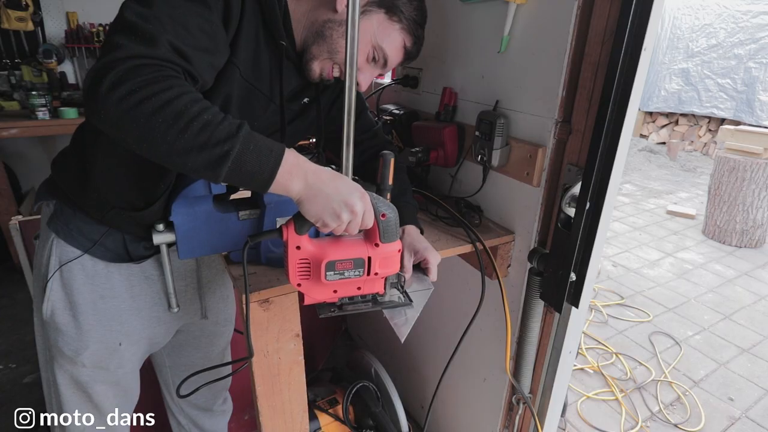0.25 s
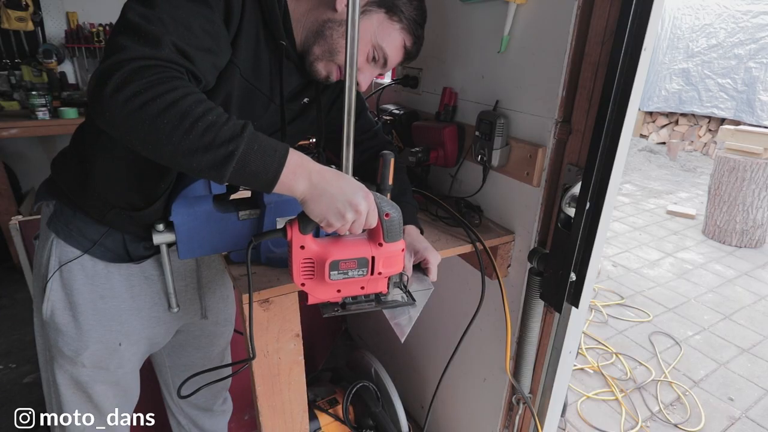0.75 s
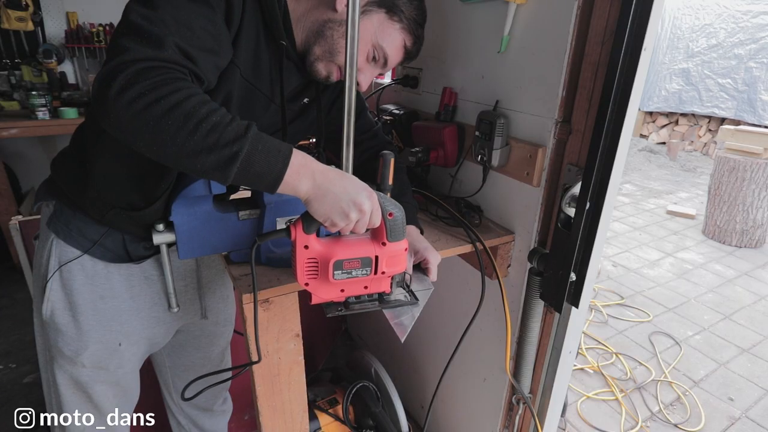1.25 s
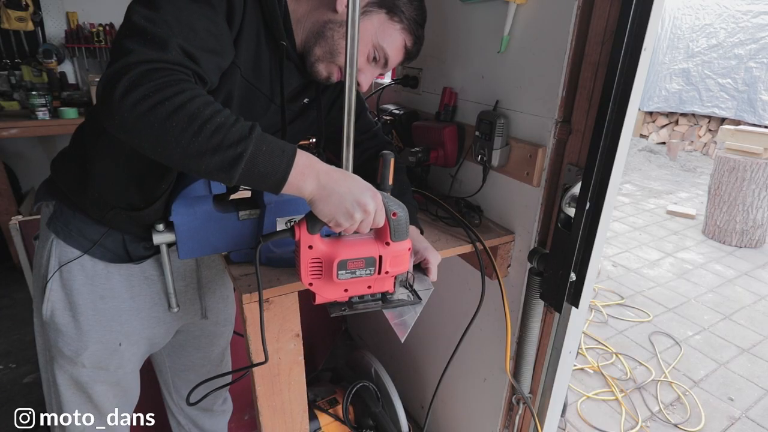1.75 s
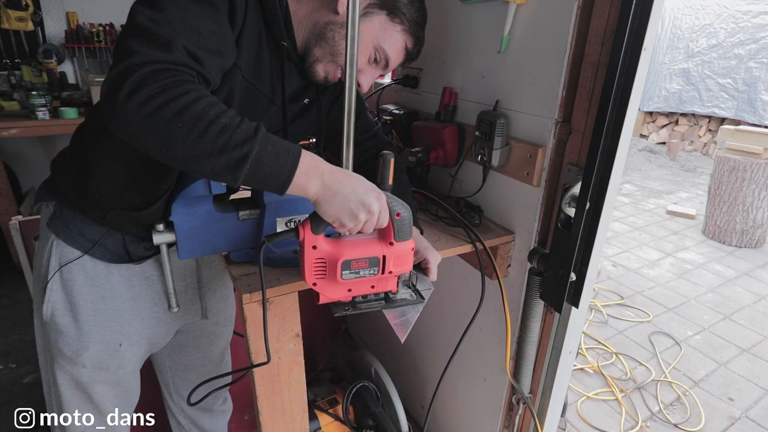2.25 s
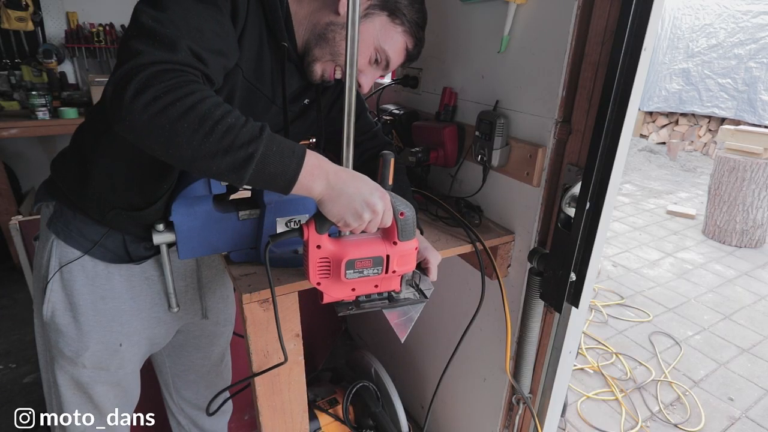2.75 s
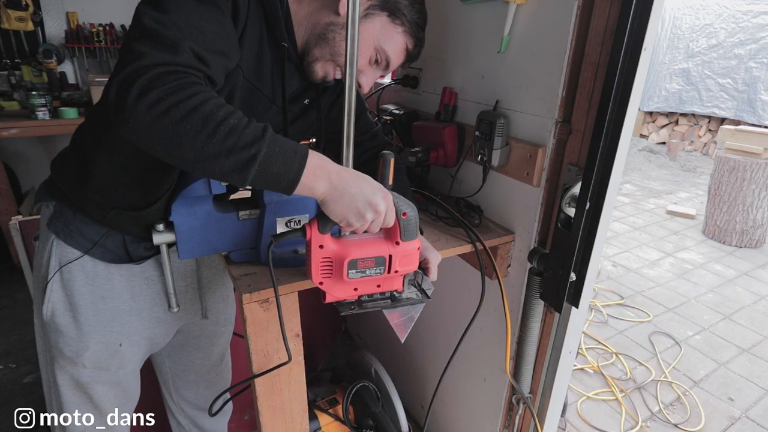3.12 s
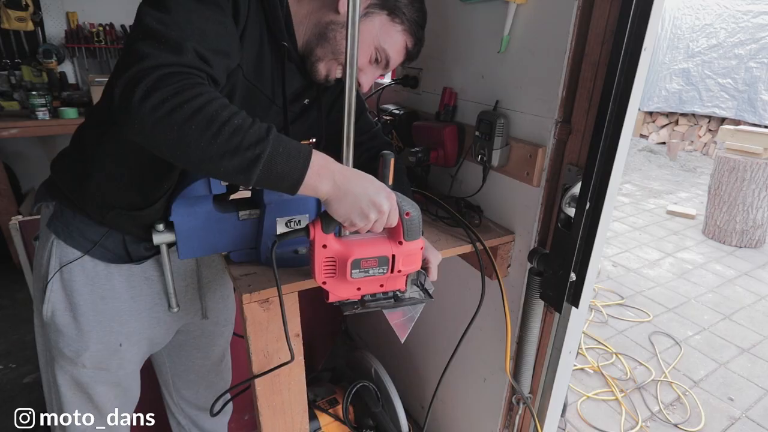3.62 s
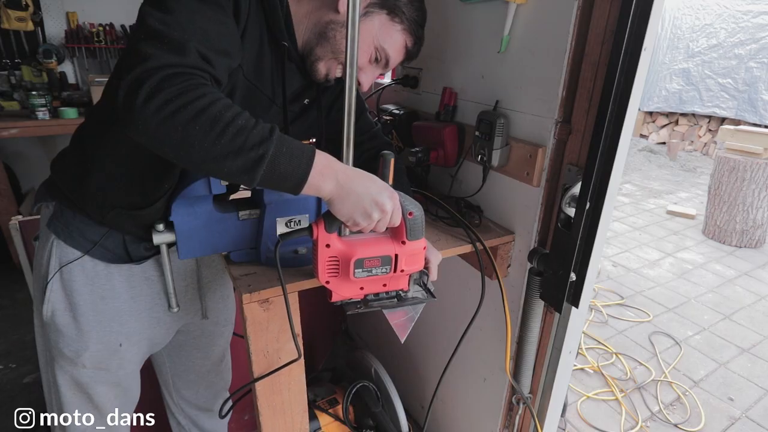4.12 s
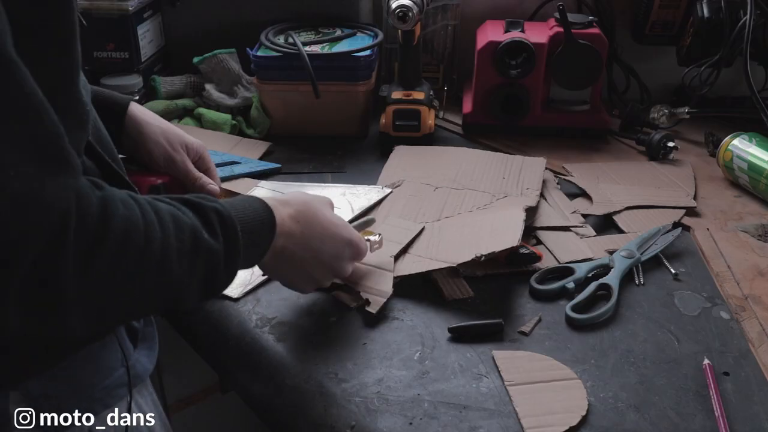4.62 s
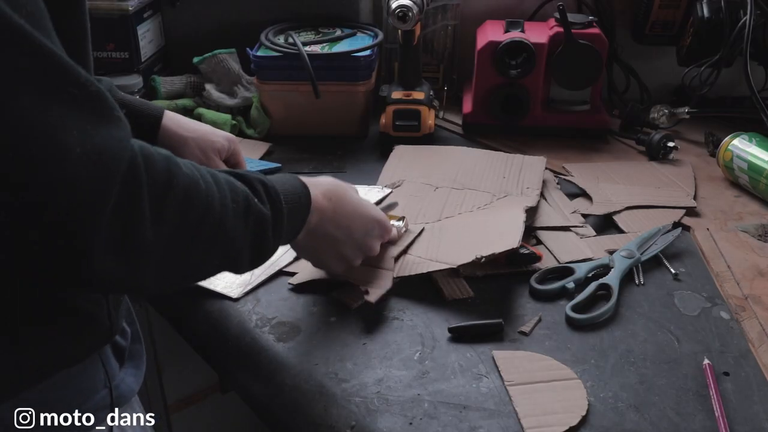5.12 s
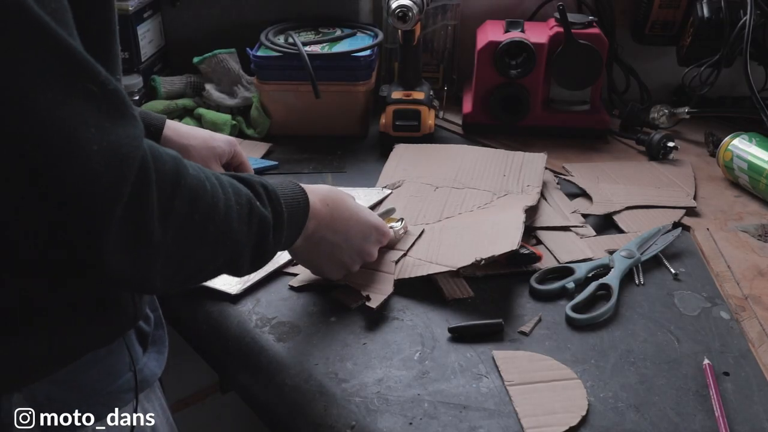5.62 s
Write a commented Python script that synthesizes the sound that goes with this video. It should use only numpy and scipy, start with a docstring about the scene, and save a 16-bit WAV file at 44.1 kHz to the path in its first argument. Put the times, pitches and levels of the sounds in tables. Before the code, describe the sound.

High-pitched, rapid jigsaw cutting of sheet metal, followed suddenly by hands shuffling cardboard and clicking small parts on a bench.

```python
"""Jigsaw, then a quiet bench.

A jigsaw cuts thin aluminium sheet held in a vice. Its teeth rasp on every stroke and set the sheet
ringing and drumming over the motor's hum and gear whine. At 4.2 s the scene switches to a quiet bench,
where hands rustle, shuffle card, and click and knock small parts over the rumble of the room."""
import sys
import numpy as np
from scipy import signal
from scipy.fft import rfft, irfft, next_fast_len
from scipy.io import wavfile
from scipy.ndimage import uniform_filter1d

SR = 44100
rng = np.random.default_rng(int(sys.argv[2]) if len(sys.argv) > 2 else 0)


def int16_out(signal):
    """Quantize to a 16-bit WAV file."""
    q = np.round(np.clip(np.atleast_2d(signal).T, -1, 1) * 32767)
    wavfile.write(sys.argv[1], SR, q.astype(np.int16))


N = 259263


def amp(db):
    return 10 ** (np.asarray(db) / 20)


def unit_rms(x):
    return x / np.sqrt(np.mean(x ** 2) + 1e-20)


def unit_peak(x):
    return x / abs(x).max()


def curves(rows):
    """Each column after the time column, interpolated to every sample."""
    times, *columns = np.transpose(rows)
    return [np.interp(np.arange(N) / SR, times, column) for column in columns]


def butter(x, order, hz, kind):
    return signal.sosfilt(signal.butter(order, hz, kind, fs=SR, output="sos"), x)


def coloured(x, spectrum, modes=()):
    """Filter by a spectrum raised at each mode, to unit RMS. Minimum phase: rings follow their cause."""
    size = next_fast_len(len(x) + 8192, True)
    hz = np.fft.rfftfreq(size, 1 / SR)
    points_hz, points_db = np.transpose(spectrum)
    gain = amp(np.maximum(np.interp(np.log(hz + 1), np.log(points_hz + 1), points_db), -100))
    for centre_hz, width_hz, db in modes:
        gain *= 1 + amp(db) / (1 + (2 * (hz - centre_hz) / width_hz) ** 2)
    cepstrum = irfft(np.log(gain), size)
    cepstrum[1:size // 2] *= 2
    cepstrum[size // 2 + 1:] = 0
    return unit_rms(irfft(rfft(x, size) * np.exp(rfft(cepstrum)), size)[:len(x)])


def add(mix, start_s, sound):
    part = mix[round(start_s * SR):][:len(sound)]
    part += sound[:len(part)]


def grit(depth_db, grain_s):
    """Noise whose level flickers in grains."""
    flicker = unit_rms(uniform_filter1d(rng.standard_normal(N), int(grain_s * SR)))
    return rng.standard_normal(N) * amp(depth_db * np.clip(flicker, -3, 3))


def echoes(x, t60_s, db):
    """Add a short tail of sparse reflections."""
    t = np.arange(SR // 4) / SR
    tail = rng.standard_normal(len(t)) * (rng.random(len(t)) < .1) * amp(-60 * t / t60_s) * (t > .003)
    return x + amp(db) * signal.oaconvolve(x, tail / np.linalg.norm(tail))[:N]


def swells(peaks_s, peaks_db, rise_db_s, fall_db_s):
    """Envelope of overlapping movements, summed in power."""
    since_s = np.arange(N) / SR - peaks_s[:, None]
    db = peaks_db[:, None] + np.where(since_s < 0, rise_db_s, -fall_db_s) * since_s
    return np.sqrt((amp(db) ** 2).sum(0))


# Room spectrum. Each row: frequency in Hz, relative level in dB.
ROOM_SPECTRUM = [(12, -49), (20, 4), (38, -2.5), (216, -13), (367, -20.5), (446, -17.5), (678, -23.5),
                 (759, -13), (825, -16.5), (1150, -25), (1370, -31), (3840, -46), (7310, -39.5),
                 (16000, -62)]


def room():
    """Steady rumble with a little hiss."""
    return amp(-47) * coloured(rng.standard_normal(N), ROOM_SPECTRUM)


# Handling spectra. Each row: frequency in Hz, relative level in dB.
RUSTLE_SPECTRUM = [(880, -28), (1500, -27), (1640, -17), (2000, -53), (2610, -8), (3880, -8), (4870, -5),
                   (7840, -1), (16000, -35)]
SHUFFLE_SPECTRUM = [(150, -18), (250, 0.5), (512, -5), (664, 0), (1020, 2), (1420, -2), (3000, -17.5),
                    (3900, -23), (6600, -120)]
# Hand movements. Each row: peak time in seconds, rustle in dB, shuffle in dB.
HAND_MOVES = [(4.21, -58.5, -55.5), (4.44, -50, -64), (4.53, -51, -75), (4.6, -49.5, -58),
              (4.85, -51.5, -57.5), (4.97, -56.5, -74), (5.2, -55.5, -55), (5.31, -47, -52),
              (5.42, -54.5, -67), (5.52, -61.5, -74), (5.62, -67, -78)]


def hands():
    """Each movement swells a bright rustle and a duller shuffle of card."""
    peaks_s, rustle_db, shuffle_db = np.transpose(HAND_MOVES)
    rustle_gain = swells(peaks_s, rustle_db, rise_db_s=196, fall_db_s=103)
    shuffle_gain = amp(-64.5) + swells(peaks_s, shuffle_db, rise_db_s=76, fall_db_s=45)
    rustle = coloured(grit(depth_db=1.8, grain_s=.01), RUSTLE_SPECTRUM)
    shuffle = coloured(grit(depth_db=1.6, grain_s=.0046), SHUFFLE_SPECTRUM)
    return rustle_gain * rustle + shuffle_gain * shuffle


# Bench modes. Each row: frequency in Hz, relative level in dB, T60 in seconds.
BENCH_MODES = [(295, -17, 0.064), (448, -7, 0.046), (555, -9, 0.2), (790, -4.5, 0.064), (1008, -3, 0.092),
               (1147, 7, 0.044), (1413, 7.5, 0.083), (1760, -28, 0.045), (2130, -7, 0.046)]
# Blows on the bench. Each row: start in seconds, dry peak in dB, hardness as a corner in Hz.
BENCH_BLOWS = [(4.4031, -33, 2500), (4.62, -28, 1510), (4.638, -31, 910), (4.653, -34, 1180),
               (4.812, -37.5, 710), (4.935, -48, 2500), (5.158, -23, 2060), (5.176, -26, 1090),
               (5.187, -33, 1800), (5.261, -32, 1320), (5.281, -31, 1110), (5.288, -30.5, 900),
               (5.403, -37.5, 696), (5.496, -36, 1520)]


def knocks():
    """Each blow thuds and rings the bench modes in its own mix; a soft blow loses the high ones."""
    out, t = np.zeros(N), np.arange(6000) / SR
    for start_s, db, hard_hz in BENCH_BLOWS:
        noise = rng.standard_normal(len(t))
        ring = 0
        for (hz, mode_db, t60_s), gain_draw, tune_draw in zip(BENCH_MODES, noise, noise[::-1]):
            envelope = amp(mode_db + 5.1 * gain_draw - 60 * t / t60_s) / (1 + (hz / hard_hz) ** 2)
            ring += envelope * np.sin(2 * np.pi * hz * (1 + .041 * tune_draw) * t)
        thud = butter(noise * np.exp(-t / .0068), 2, [450, 1.19 * hard_hz], "band")
        add(out, start_s, amp(db) * unit_peak(unit_peak(ring) + .66 * unit_peak(thud)))
    return echoes(out, t60_s=.11, db=-7.5)


# Clicks of small parts. Each row: start in seconds, level in dB, centre in Hz, decay in seconds,
# bandwidth in octaves.
PART_CLICKS = [(4.293, -29.5, 7400, 0.0019, 0.48), (4.333, -37.5, 6600, 0.0072, 1.35),
               (4.3999, -25, 7000, 0.0027, 1.2), (4.402, -17, 8700, 0.007, 0.35),
               (4.4042, -16.5, 6300, 0.0008, 0.98), (4.4128, -22.5, 5730, 0.0024, 0.36),
               (4.418, -22.5, 4850, 0.00052, 2.6), (4.4285, -21.5, 6000, 0.0027, 0.85),
               (4.612, -32, 5350, 0.0017, 0.64), (4.626, -30, 3800, 0.0028, 1.7),
               (4.777, -43, 7300, .004, 1.3), (4.869, -23.5, 6640, 0.00041, 0.77),
               (4.874, -35, 5770, 0.0022, 0.37), (4.93, -28, 5840, 0.0053, 1.7),
               (4.935, -22, 6460, 0.0023, 1.9), (4.938, -27, 6840, 0.0067, 0.46),
               (4.961, -35, 7500, 0.004, 0.89), (5.139, -31, 7200, 0.006, 1.2),
               (5.16, -26, 3280, 0.0013, 2.1), (5.186, -29.5, 3000, 0.0023, 3.2),
               (5.192, -36.5, 6840, 0.0028, 0.4), (5.253, -46, 4750, 0.0039, 1.2),
               (5.2794, -20, 4700, 0.0014, 1.9), (5.287, -20, 6600, 0.0022, 0.97),
               (5.345, -42.5, 2450, 0.0025, 0.42), (5.408, -32.5, 5450, 0.0042, 2.1),
               (5.495, -28.5, 3300, 0.00067, 1.83)]
# Colour of all clicks. Each row: frequency in Hz, relative gain in dB.
CLICK_COLOUR = [(200, 25), (3000, 5), (7000, 5.5), (9500, 0), (12000, -5), (16000, -9)]


def clicks():
    """Small hard parts touch: a sharp tick and a dying crackle in one band."""
    out, t = np.zeros(N), np.arange(2500) / SR
    attack = np.minimum(t / .00056, 1)
    for start_s, db, hz, decay_s, octaves in PART_CLICKS:
        decay = np.exp(-t / decay_s) + .12 * np.exp(-t / (6.9 * decay_s))
        spread = 2 ** (octaves / 2)
        burst = butter(rng.standard_normal(len(t)) * attack * decay, 2, [hz / spread, hz * spread], "band")
        add(out, start_s, amp(db) * unit_peak(burst))
    return echoes(coloured(out, CLICK_COLOUR) * np.std(out), t60_s=.084, db=-8)


# Crank harmonics. Each row: multiple of the stroke rate, RMS level in dB.
CRANK_HARMONICS = [(1, -86.5), (2, -83), (3, -81.5), (4, -88), (5, -81), (6, -83.5), (8, -80.5)]


def motor(turns):
    """The crank hums at multiples of the stroke rate."""
    return sum(amp(db) * np.sqrt(2) * np.cos(2 * np.pi * (k * turns + rng.random()))
               for k, db in CRANK_HARMONICS)


# Drumming spectrum. Each row: frequency in Hz, relative level in dB.
DRUM_SPECTRUM = [(15, -89), (25, -38), (118, -28.5), (320, -21), (555, -12), (831, -1), (1140, -6.5),
                 (1820, -4.5), (2160, -12.5), (4000, -19.5), (5200, -16), (8800, -120)]
# Low sheet modes. Each row: frequency in Hz, width in Hz, strength in dB.
LOW_MODES = [(472, 5.7, 3.5), (813, 30, -9), (1048, 5.3, 5.5), (1366, 15, 1.5)]


def sheet_drum(turns):
    """The sheet drums in its low modes, pulsing twice a stroke."""
    pulse = 1 + .14 * np.cos(4 * np.pi * (turns - .15))
    return coloured(grit(depth_db=1.2, grain_s=.002) * pulse, DRUM_SPECTRUM, LOW_MODES)


# Sizzle level. Each row: time in seconds, level in dB.
SIZZLE_LEVELS = [(2.9, -85), (3.2, -66), (3.7, -61), (4.1, -62), (4.2, -68)]


def sheet_sizzle(contact, mode_hz=10850):
    """A high sheet mode sizzles near the end of the cut."""
    level_db, = curves(SIZZLE_LEVELS)
    drive = rng.standard_normal(N) * (contact + .25)
    return amp(level_db) * unit_rms(butter(drive, 1, [mode_hz - 70, mode_hz + 70], "band"))


# Motor gear whine at 826 Hz, then three sheet modes rung by the teeth.
# Each row: frequency in Hz, T60 in seconds, lead on mid-cut in strokes.
STROKE_TONES = [(826, 0.041, 0.23), (1640, 0.021, 0.076), (1884, 0.005, .01), (3400, 0.018, .01)]
# Tone levels. Each row: time in seconds, then the level in dB of each of the four tones.
TONE_LEVELS = [(0, -64, -58, -68, -79), (.3, -68, -58, -78, -65), (.55, -70, -57.5, -62, -69),
               (.9, -64, -57.5, -69, -63), (1.05, -69, -54.5, -73, -68), (1.7, -57, -57, -63, -77),
               (1.95, -62, -54.5, -60.5, -75), (2.3, -71, -71, -55, -70), (3, -71, -59.5, -52.5, -68),
               (3.6, -72, -59, -49, -68), (4.2, -62, -61, -48.5, -75)]
MAX_STROKES = 250


def whine_and_rings(turns, stroke, phase, force):
    """Gear whine and three sheet modes, all pulsing in step with the crank."""
    stroke_hz = np.maximum(np.gradient(turns) * SR, 1)
    offset_cycles = .14 * rng.standard_normal(MAX_STROKES)[stroke]
    back = .45 * np.exp(-((phase - .47) / .16) ** 2)
    out, t = 0, np.arange(3000) / SR
    for (hz, t60_s, lead), db in zip(STROKE_TONES, curves(TONE_LEVELS)):
        forward = force * np.exp(-abs((phase + lead) / .14) ** 4)
        push = (forward + back) * np.cos(2 * np.pi * (hz * phase / stroke_hz + offset_cycles))
        response = amp(-60 * t / t60_s) * np.cos(2 * np.pi * hz * t)
        out += amp(db) * unit_rms(signal.oaconvolve(push, response)[:N])
    return out


def sheet_flex(x, depth_db=1.3):
    """Patches of the spectrum swell and fade as the flexing sheet favours other modes."""
    spectra = signal.stft(x, nperseg=256)[2]
    drift = uniform_filter1d(rng.standard_normal(spectra.shape), size=2, axis=0)
    drift = unit_rms(uniform_filter1d(drift, size=70, axis=1))
    return unit_rms(signal.istft(spectra * amp(depth_db * drift), nperseg=256)[1][:N])


# Blade catches. Each row: time in seconds, level over a usual stroke in dB.
BLADE_CATCHES = [(.658, 2), (.877, 2), (.897, 5.5), (1.005, 3), (1.246, 4.5), (2.205, 7), (3.03, 4.5),
                 (3.138, 2), (3.741, 2.5), (4.064, 5.5)]


def blade_bite(turns, stroke, phase, shift):
    """Envelope of the cutting strokes: the blade digs in slowly, lets go fast and sometimes catches."""
    catch_s, catch_db = np.transpose(BLADE_CATCHES)
    caught = np.round(turns[(catch_s * SR).astype(int)]).astype(int)
    bite_db = 1.3 * rng.standard_normal(MAX_STROKES)
    bite_db[caught] = catch_db
    width = np.where(phase < .03, .16, .11)
    return amp(bite_db[stroke]) * np.exp(-abs((phase - .01 - shift) / width) ** 1.26)


def blade_drag(phase, shift):
    """Envelope of the teeth dragging back, about half a stroke after the cut."""
    offset = (phase - .46 - shift + .5) % 1 - .5
    return np.exp(-(offset / .064) ** 2)


# Rasp spectrum. Each row: frequency in Hz, relative level in dB.
RASP_SPECTRUM = [(1180, -33), (2000, -21.5), (2260, -14), (3370, -13), (3740, -12.5), (5250, -10),
                 (7060, -9), (11100, -19.5), (16000, -39.5)]
# Sheet modes, whole and nearly cut through. Each row: frequency in Hz, width in Hz, strength in dB.
WHOLE_MODES = [(2577, 81, 0.5), (3040, 98, 2.5), (3380, 76, 1), (4740, 98, -10), (6170, 200, -4),
               (7110, 650, -0.5), (8480, 100, 2.5), (9530, 1200, -2.5), (11900, 83, -36)]
FREED_MODES = [(3130, 60, 0), (3405, 57, 4.5), (4860, 43, 1), (5860, 640, 2), (6890, 270, 7),
               (7700, 135, 9.5), (8790, 980, 7), (12900, 280, 0)]


def rasp(contact, rattle_db, freed, treble_db):
    """Teeth tear the sheet over a duller rattle; the modes shift as the kerf grows."""
    tearing = grit(depth_db=1.83, grain_s=.00038) * contact
    rattle = amp(rattle_db) * butter(grit(depth_db=3.1, grain_s=.0011), 1, 10000, "low")
    whole = coloured(tearing + rattle, RASP_SPECTRUM, WHOLE_MODES)
    loose = coloured(tearing + rattle, RASP_SPECTRUM, FREED_MODES)
    sheet = sheet_flex((1 - freed) * whole + freed * loose)
    return sheet + (amp(treble_db) - 1) * butter(sheet, 1, 9000, "high")


# Blade travel. Each row: time in seconds, strokes so far (whole numbers fall at mid-cut).
STROKE_COUNT = [(0, -.31), (.4, 18.15), (1, 45.62), (2.6, 119.12), (3.2, 146.8), (4, 183.96),
                (4.21, 193.69)]
# Feed: clean, then chattering, then settled. Each row: time in seconds, rasp in dB,
# rattle relative to the tearing in dB, drumming in dB.
FEED_LEVELS = [(0, -49.5, -9, -50), (.3, -45, -13, -51), (.7, -43, -13.5, -51.5), (1.4, -44, -11.5, -51),
               (1.64, -44, -7, -46), (1.95, -46, -5, -48.5), (2.15, -44.5, -6, -47.5),
               (2.25, -46.5, -7.5, -50.5), (2.4, -43.5, -9, -48.5), (2.8, -42.5, -9.5, -49),
               (3.4, -43.5, -11, -51.5), (3.8, -44, -10.5, -51), (4.2, -47.5, -4, -51.5)]
# Growing kerf. Each row: time in seconds, sheet freed from 0 to 1, return drag relative to the cut
# in dB, treble lift in dB.
KERF_GROWTH = [(0, 0.07, -8, 11.5), (.6, 0.28, -25, 9), (1.2, 0.2, -13, 4), (1.9, 0, -25, 5),
               (2.3, 0.1, -10, 2), (3, 0.93, -5.5, 2.5), (3.6, 0.66, -9.5, 5.5), (4.2, 0.76, -34, 4.5)]


def jigsaw():
    """The crank drives the blade through the sheet and more softly back; no two strokes are alike."""
    turns, = curves(STROKE_COUNT)
    rasp_db, rattle_db, drum_db = curves(FEED_LEVELS)
    freed, drag_db, treble_db = curves(KERF_GROWTH)
    stroke = np.floor(turns + .25).astype(int)
    phase = turns - stroke  # -.25 to .75 strokes from mid-cut
    drag_draw, shift_draw, late_draw, tone_draw = rng.standard_normal((MAX_STROKES, 4))[stroke].T
    bite = blade_bite(turns, stroke, phase, shift=.019 * shift_draw)
    drag = amp(drag_db + 4.5 * drag_draw) * blade_drag(phase, shift=.042 * late_draw)
    contact = bite + drag
    return (amp(rasp_db) * rasp(contact, rattle_db, freed, treble_db)
            + sheet_sizzle(contact)
            + whine_and_rings(turns, stroke, phase, force=amp(1.2 * tone_draw))
            + amp(drum_db) * sheet_drum(turns)
            + motor(turns))


def scene():
    """The saw, then an abrupt switch to the bench."""
    switch_s, fade_s = 4.2005, .00091
    saw = jigsaw()
    bench = room() + hands() + clicks() + knocks()
    after = np.clip((np.arange(N) / SR - switch_s) / fade_s, 0, 1)
    return (saw * (1 - after) + bench * after)[None]


def record(dry):
    """Low-pass at 15.9 kHz over a faint hiss."""
    lowpass = signal.firwin(511, 15900, window=("kaiser", 9), fs=SR)
    return signal.oaconvolve(dry, lowpass[None], "same") + amp(-104) * rng.standard_normal(dry.shape)


dry = scene()
out = record(dry)
int16_out(out)
```